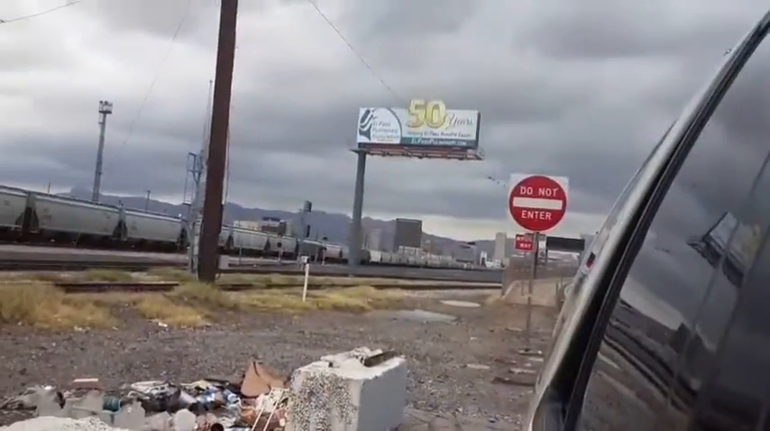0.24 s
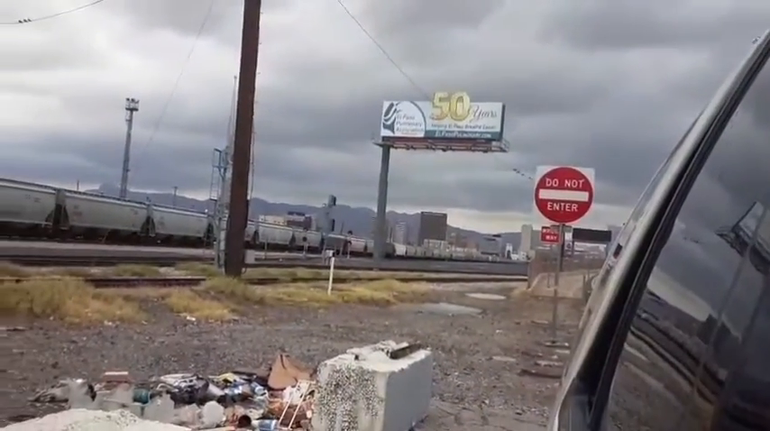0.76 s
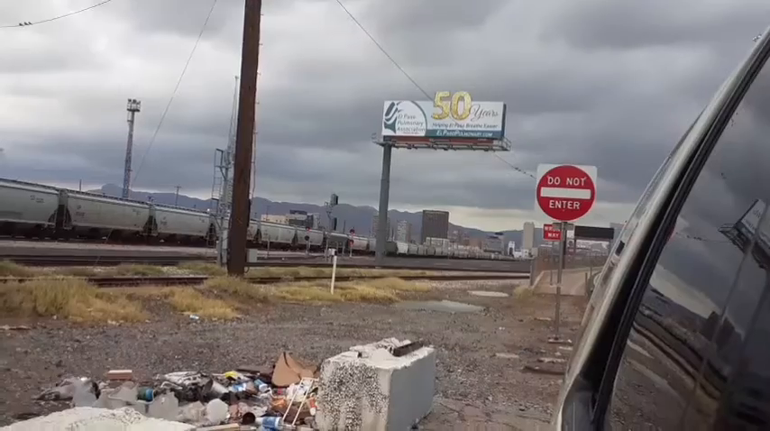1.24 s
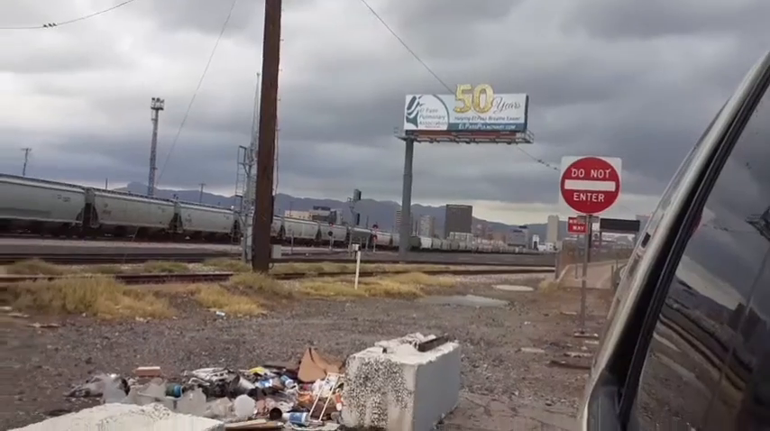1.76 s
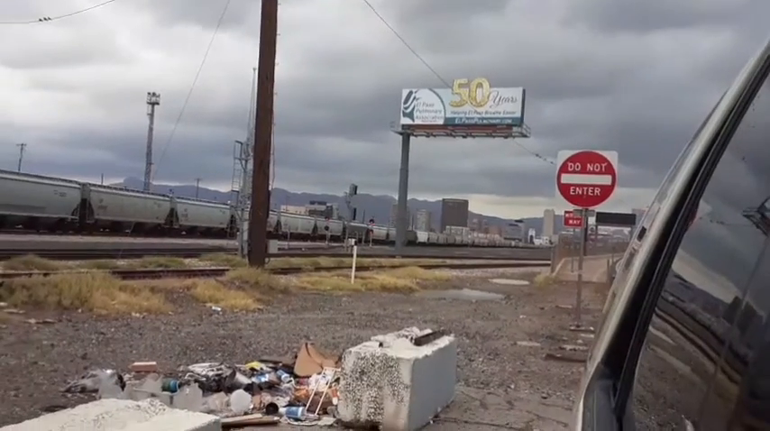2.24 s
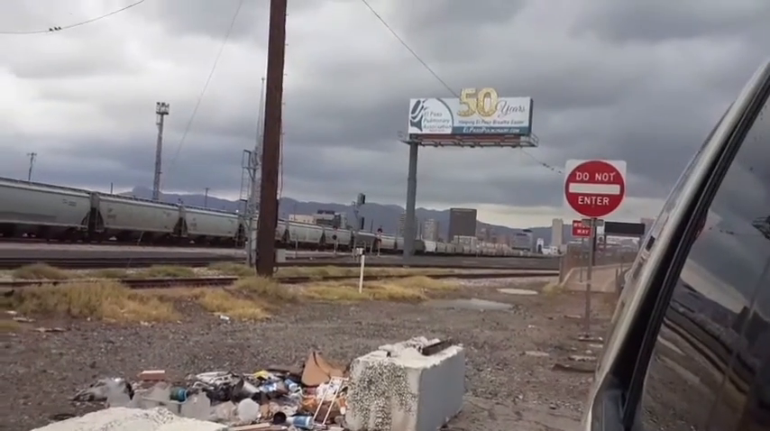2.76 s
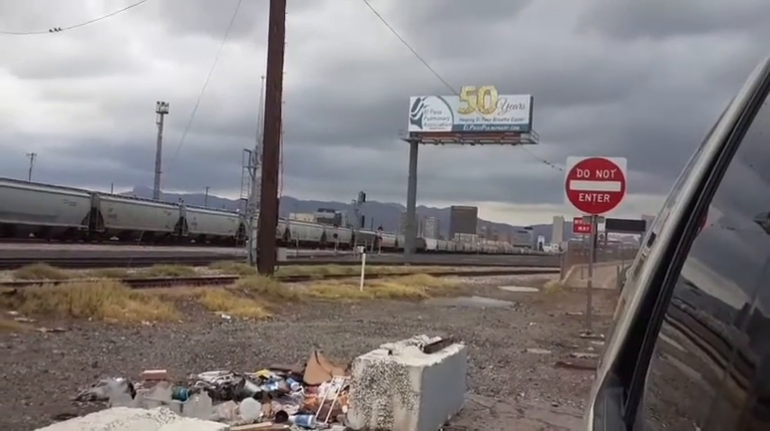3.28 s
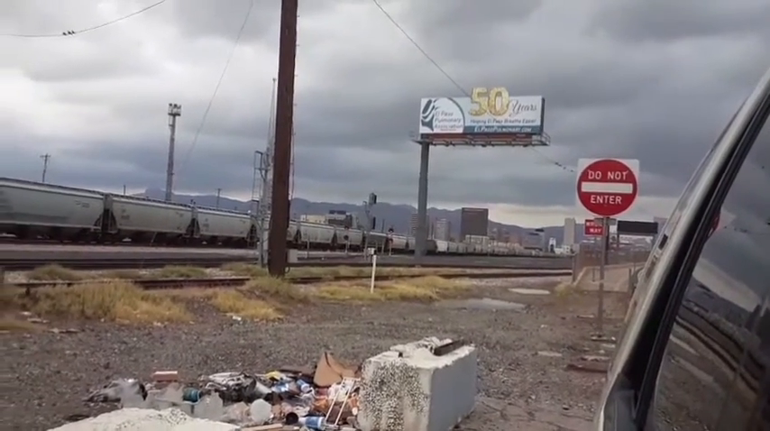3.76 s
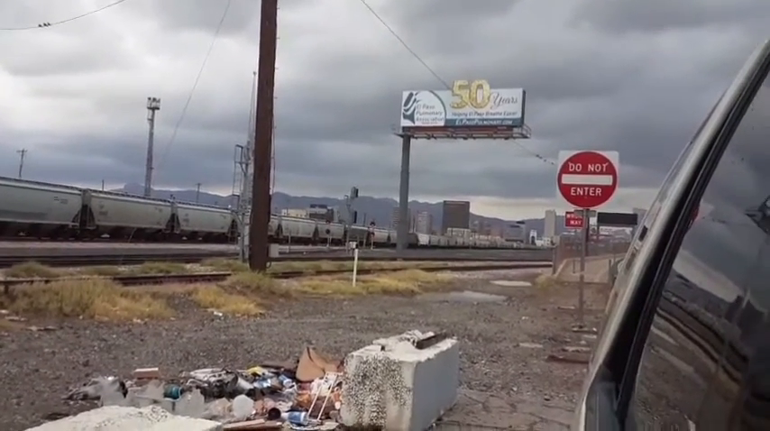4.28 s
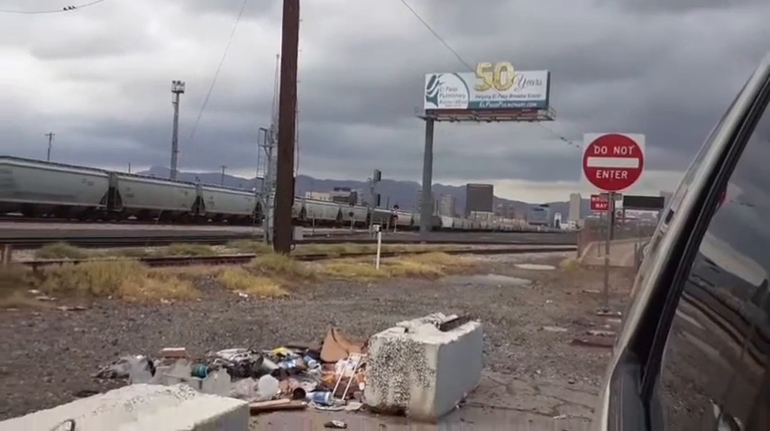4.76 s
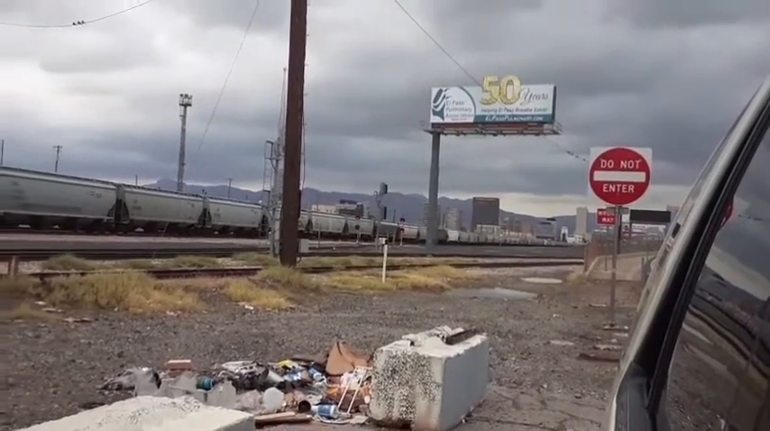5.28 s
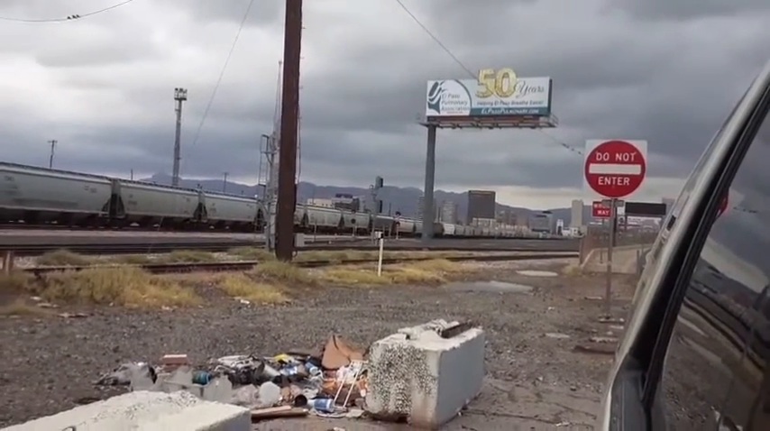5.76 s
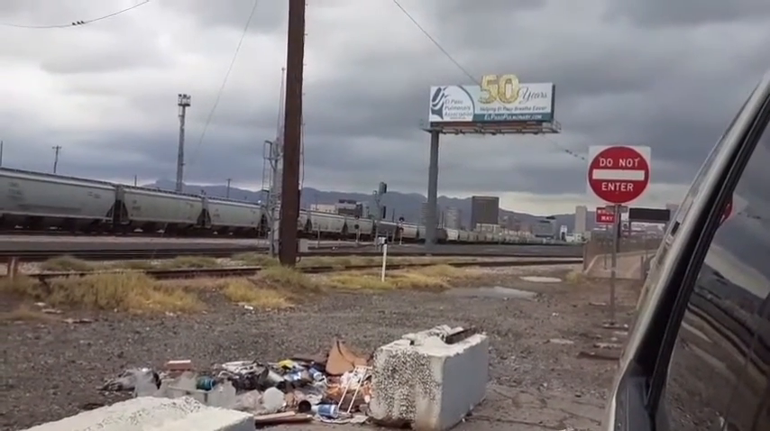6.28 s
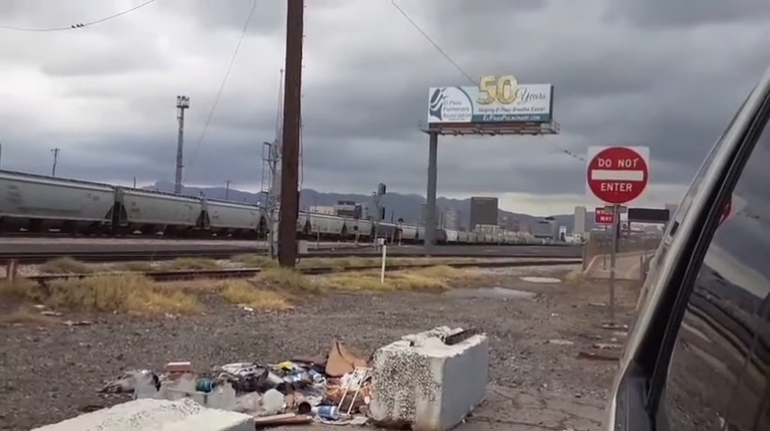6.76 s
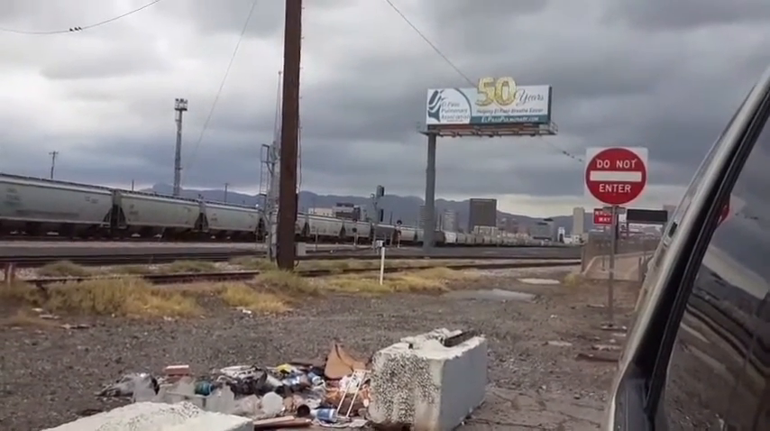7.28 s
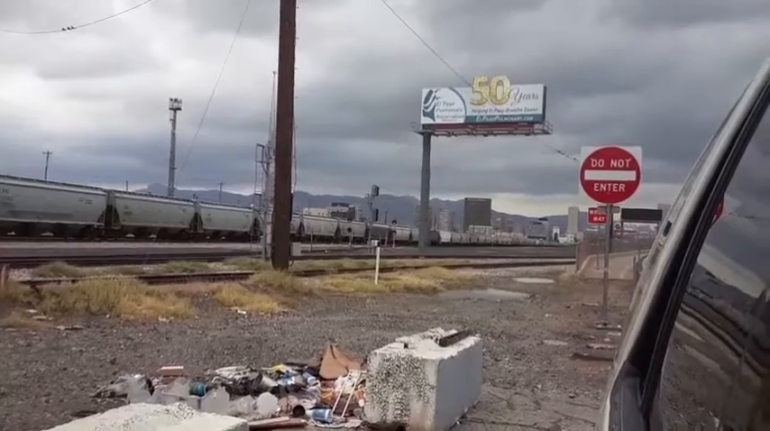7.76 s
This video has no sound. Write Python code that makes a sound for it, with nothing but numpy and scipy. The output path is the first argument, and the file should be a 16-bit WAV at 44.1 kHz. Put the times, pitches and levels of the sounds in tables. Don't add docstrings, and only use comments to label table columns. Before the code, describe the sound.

A slow freight train washes past in a rail yard while one wheel squeals piercingly, swelling and fading, with wind buffeting the microphone.

```python
import sys
import numpy as np
from scipy import signal
from scipy.io import wavfile
from scipy.ndimage import uniform_filter1d

SR = 44100
rng = np.random.default_rng(int(sys.argv[2]) if len(sys.argv) > 2 else 0)


def convert_level_to_amplitude(level_db):
    exponent = np.asarray(level_db, float) / 20
    return 10 ** exponent


def put_to_file(sound):
    columns = np.atleast_2d(sound).T
    safe = np.clip(columns, -1, 1)
    whole_steps = np.round(safe * 32767)
    wavfile.write(sys.argv[1], SR, whole_steps.astype(np.int16))


N = 354117
T = np.arange(N) / SR
SLIP_HZ = 2260.9

# t/s, roughness as level of the third multiple/dB, overdrive as level of the ring's octave/dB
SLIP = [(0, -66.5, -69), (.6, -49, -65), (1.05, -61.5, -55), (1.4, -63.5, -37.5), (1.8, -71.5, -53),
        (2.05, -60.5, -49), (2.3, -69.5, -72), (2.9, -71.5, -70), (3.03, -56.5, -42.5), (3.2, -81, -60),
        (3.55, -55.5, -50), (4.22, -72.5, -68), (4.5, -59.5, -46), (5.1, -50.5, -58), (5.7, -60.5, -61),
        (6.15, -54, -39), (6.9, -53.5, -46.5), (8.03, -82, -71)]


def evened(x):
    return x / np.sqrt(np.mean(abs(x) ** 2) + 1e-20)


def read(points, hz):
    f, value = np.transpose(points)
    return np.interp(np.log(hz + 1), np.log(f + 1), value)


def played(rows):
    s, *columns = np.transpose(rows)
    return [np.interp(T, s, c) for c in columns]


def sides(pan_db):
    return np.sqrt(2 / (1 + convert_level_to_amplitude(np.array([-2 * pan_db, 2 * pan_db]))))


def bump(s, db, width):
    u = np.tanh((T[::16] - s) / max(width, .004))
    return u + 1j * convert_level_to_amplitude(db) * np.sqrt(1 - u ** 2)


def lifted(rows):
    sizes = [abs(bump(*row)) for row in rows]
    return np.interp(T, T[::16], np.prod(sizes, axis=0))


def fading(width_hz, shared=3.6):
    r = np.exp(-np.pi * width_hz / SR)
    a, b = rng.standard_normal((N // 16 + 2, 3, 2)).T
    z = signal.lfilter([1], [1, -r ** 64], a + 1j * b)
    z = signal.lfilter([1], [1, -r ** 16], z)
    z = signal.resample_poly(z[:2] + shared * z[2], 16, 1, axis=1)[:, :N]
    return evened(z)


def line(hz, width_hz, steady, shared=1.34):
    steady = np.clip(steady, 0, 1)
    swing = steady + np.sqrt(1 - steady ** 2) * fading(width_hz, shared)
    return np.sqrt(2) * (swing * np.exp(2j * np.pi * hz * T)).real


def noise(spectrum, same, patchy_db, flicker_db):
    # f/Hz, phase/rad
    lead_curve = [(0, 0), (1000, .3), (2500, 1.3), (4400, 6.5), (7600, 6 * np.pi), (16000, 6 * np.pi)]
    frames, hz = N // 256 + 5, np.fft.rfftfreq(1024, 1 / SR)
    a, b, c, d, patches = rng.standard_normal((frames, 513, 5)).T
    patches = uniform_filter1d(patches, size=8, axis=0)
    patches = evened(uniform_filter1d(patches, size=10, axis=1))
    flicker = evened(uniform_filter1d(rng.standard_normal(frames), size=3))
    same = np.clip(same * np.ones(513), 0, 1)[:, None]
    left = a + 1j * b
    right = same * left + np.sqrt(1 - same ** 2) * (c + 1j * d)
    right = right * np.exp(-1j * read(lead_curve, hz))[:, None]
    shape_db = read(spectrum, hz) - 80 * (hz > spectrum[-1][0])
    gain = convert_level_to_amplitude(shape_db)[:, None] * convert_level_to_amplitude(patchy_db * patches + flicker_db * flicker)
    spectra = np.array([left, right]) * gain
    return evened(signal.istft(spectra, nperseg=1024, noverlap=768)[1][:, :N])


def squeal():
    # t/s, level/dB, left lead/rad
    grip = [(0.0, -45.5, 0.19), (0.274, -28, 0.74), (0.66, -27, -0.034), (1.04, -20.5, -0.16),
            (1.388, -12.5, 0.58), (1.702, -21.5, 0.64), (2.131, -13.5, 0.1), (2.613, -47.6, 0.28),
            (2.922, -40, -0.72), (2.96, -24.5, -0.24), (3.51, -19.5, 0.43), (4.24, -36.5, 0.83),
            (4.735, -19, -0.3), (5.223, -20, 0.3), (5.46, -36, 1.1), (6.313, -19.5, 0.9),
            (7.161, -26, 1.45), (8.03, -49, 0.7)]
    # t/s, gain/dB, half width/s
    swells = [(0.398, 4.2, 0.013), (0.585, 8.7, 0.013), (0.702, 9.0, 0.039), (0.884, 6.5, 0.013),
              (0.988, 9.7, 0.051), (3.038, 7.1, 0.054), (3.552, 8.5, 0.014), (3.627, 7.2, 0.013),
              (3.981, 7.7, 0.03), (4.228, 7.8, 0.013), (4.418, 11.0, 0.026), (4.862, 5.0, 0.02),
              (5.077, 8.4, 0.013), (5.264, 7.3, 0.021), (5.367, 7.7, 0.013), (5.483, 8.6, 0.013),
              (5.664, 6.4, 0.013), (5.952, 11.0, 0.017), (6.067, 4.9, 0.014), (6.159, 6.8, 0.027),
              (6.272, 6.4, 0.015), (6.373, 4.5, 0.017), (6.826, 11.0, 0.013), (6.887, 11.0, 0.013),
              (7.155, 5.8, 0.015), (7.217, 5.8, 0.013), (7.454, 7.7, 0.013), (7.573, 6.5, 0.028)]
    # t/s, depth/dB, half width/s
    cancels = [(0.23, -17.6, 0.024), (0.506, -14.6, 0.012), (0.66, -18.1, 0.013), (0.795, -9.9, 0.04),
               (0.964, -12.0, 0.034), (1.191, -8.8, 0.022), (2.332, -35.0, 0.015), (3.449, -18.0, 0.03),
               (3.582, -29.3, 0.054), (3.665, -24.1, 0.014), (3.787, -9.4, 0.034), (4.08, -13.7, 0.01),
               (4.382, -23.8, 0.043), (4.838, -17.3, 0.021), (4.961, -3.9, 0.056), (5.022, -10.8, 0.015),
               (5.123, -13.7, 0.07), (5.915, -8.7, 0.037), (6.006, -8.2, 0.037), (6.233, -13.8, 0.034),
               (6.444, -13.5, 0.022), (6.497, -14.6, 0.07), (6.617, -6.2, 0.016), (6.776, -10.4, 0.018),
               (6.844, -19.8, 0.039), (6.905, -19.1, 0.033), (6.991, -9.0, 0.07), (7.136, -32.3, 0.01),
               (7.316, -35.0, 0.022), (7.4, -11.9, 0.016)]
    level_db, lead = played(grip)
    rough_db = played(SLIP)[0]
    turns = [bump(*row) for row in cancels]
    flips = rng.random(len(cancels)) < .5
    turns = [z.conj() if flip else z for z, flip in zip(turns, flips)]
    fades = np.interp(T, T[::16], np.prod(turns, axis=0))
    flutter_db = np.minimum(-24 - .7 * level_db + .35 * (rough_db + 58), 2)
    middle = fades * (lifted(swells) + convert_level_to_amplitude(flutter_db) * fading(24)[0])
    scatter = np.minimum(convert_level_to_amplitude(0.66 * rough_db + 35), .75) * fading(14.7)
    turned = np.tan(np.clip(lead, -2, 2) / 2) + scatter[0].real
    left_share = 0.29
    apart = middle * (left_share + 1j * turned)
    apart = apart + .4 * scatter[1] * uniform_filter1d(abs(middle), size=4000)
    ring = np.exp(4j * np.pi * SLIP_HZ * T)
    tone = convert_level_to_amplitude(level_db) * ring * np.array([middle + apart, middle - apart])
    return np.sqrt(2) * tone.real


def slips():
    three_db, four_db = played(SLIP)
    one_db = 1.064 * three_db + 8
    rows = [(1, one_db + 3.5, one_db + 0.5), (3, three_db + 5.0, three_db - 2),
            (4, four_db + 2.5, three_db + 3.5), (5, three_db - 3, three_db - 6),
            (6, 0.72 * four_db - 25.5, three_db - 17.0)]
    out = convert_level_to_amplitude(.6 * three_db - 11) * line(2 * SLIP_HZ, 170, 0)
    for k, db, skirt_db in rows:
        chop = evened(uniform_filter1d(rng.standard_normal(N), size=2500))
        chop_db = np.clip(.2 * three_db + 14, 0, 3) * chop
        shared = 1.5 if k < 5 else .6
        out = out + convert_level_to_amplitude(db + chop_db - 2.5) * line(k * SLIP_HZ, 9 + 3 * k, 0.77, shared)
        out = out + convert_level_to_amplitude(skirt_db) * line(k * SLIP_HZ, 140, 0, .6 * k)
    return out * sides(2.4)[:, None]


def wheels():
    # start t/s, end t/s, level/dB, width/Hz
    squeaks = [(0, 1.95, -48.5, 15), (2.75, 2.82, -38, 20), (4.32, 4.55, -49.5, 27),
               (5.25, 5.42, -47.5, 31), (6.08, 6.33, -46, 31), (6.8, 7.25, -51, 24),
               (7.03, 7.38, -48.5, 35), (.5, 1.85, -56.5, 10), (1.95, 2.3, -56, 10), (2.3, 2.95, -59.5, 15),
               (3.5, 4.3, -55, 20), (4.85, 5.2, -52.5, 13), (7.3, 8, -59, 15), (5.9, 6.7, -61, 30),
               (6.3, 6.75, -59, 30), (7.0, 7.15, -54, 30), (6.8, 7.3, -57, 40), (.7, 1.0, -58, 40),
               (3.5, 3.66, -56, 40)]
    rings_hz = [2615, 2668, 2665, 2700, 2670, 2665, 2491, 3981, 3981, 4050, 4044, 3981, 4044, 7754, 13092,
                3800, 3480, 11800, 5700]
    out = np.zeros((2, N))
    for (start, end, db, width_hz), hz in zip(squeaks, rings_hz):
        gate = np.clip(np.minimum(T - start + .01, end - T) / .03, 0, 1)
        out += convert_level_to_amplitude(db) * gate * line(hz, width_hz, 0.07)
    return out


def train():
    # t/s, rolling level/dB, scraping hiss level/dB
    passing = [
        (0.0, -36.5, -59),
        (1.47, -43, -54.5),
        (2.39, -44, -61),
        (5.9, -40.5, -59),
        (6.02, -41, -48.5),
        (7.0, -43.5, -59),
        (8.03, -41, -61),
    ]
    # f/Hz, level/dB
    rolling_curve = [(100, -31), (250, -7), (500, -3), (950, -3), (1100, -8), (1700, -12.5), (2800, -15.5),
                     (3200, -19.5), (4500, -21), (6000, -42.5)]
    # f/Hz, level/dB
    scrape_curve = [(2500, -16.5), (4000, -2), (4900, 9), (5600, 7), (7000, 1.5), (9000, -1), (11500, -1),
                    (14000, 0), (16000, -9)]
    # f/Hz, coherence/1
    likeness = [(60, .5), (600, .5), (1400, .2), (3000, .4), (6500, .5), (8500, .85), (11000, .72),
                (15000, .75)]
    rolling_db, hiss_db = played(passing)
    same = read(likeness, np.fft.rfftfreq(1024, 1 / SR))
    rolling = convert_level_to_amplitude(rolling_db + 3.5) * noise(rolling_curve, same, 1.82, 1.0)
    scrape_db = 0.59 * hiss_db + .22 * played(SLIP)[0] - 2.5
    scrape = convert_level_to_amplitude(scrape_db) * noise(scrape_curve, same, 2.2, 1.4)
    return (rolling + scrape) * sides(1.0)[:, None]


def wind():
    # t/s, level/dB
    strength = [
        (0.0, -23),
        (0.5, -26),
        (1.3, -31.5),
        (2.2, -33),
        (3.0, -33.5),
        (4.3, -27),
        (5.4, -34.5),
        (6.1, -39),
        (7.0, -33.5),
        (8.03, -36.5),
    ]
    # t/s, lift of the bass/dB, lift of the low middle/dB, half width/s
    gust_rows = [(0.126, 5.5, 0.5, 0.024), (2.222, 9, -1.5, 0.0098), (2.49, 5.5, 6.5, 0.056),
                 (2.722, 8, 1, 0.028), (3.001, 7.5, 4, 0.1), (3.186, 8, 1, 0.016), (3.732, 12, 6, 0.0089),
                 (3.894, 4.5, 2.5, 0.028), (4.216, 4.5, 3, 0.021), (4.29, 6.5, 3, 0.0055),
                 (4.475, 2.5, 3.5, 0.1), (4.985, 10, 12, 0.02), (5.119, 12.5, 7, 0.021),
                 (5.53, 6.5, 11, 0.034), (5.636, 7, 9, 0.026), (5.701, 7, 9.5, 0.015),
                 (5.865, 14.5, 16.5, 0.035), (6.207, 8, 9.5, 0.042), (6.593, 9.4, 3, 0.0078),
                 (6.687, 11, 7, 0.0084), (6.986, 7.5, 8, 0.0092), (7.537, 1, 10, 0.0069),
                 (7.801, 0, 13.5, 0.0076), (7.888, 5, 12, 0.012)]
    # f/Hz, level per Hz/dB
    buffet_curve = [(20, -40), (45, -10), (64, 9), (85, 0), (105, -6), (130, -6), (190, -7), (260, -11),
                    (400, -22)]
    # f/Hz, level per Hz/dB
    reach_curve = [(150, -5), (240, -8), (400, -1.5), (700, -9.5), (1200, -31)]
    db, = played(strength)
    bass_lift = lifted((s, lift_db, width) for s, lift_db, _, width in gust_rows)
    reach_lift = lifted((s, lift_db, width) for s, _, lift_db, width in gust_rows)
    lumps = uniform_filter1d(rng.standard_normal(N), size=500)
    lumps = convert_level_to_amplitude(1.65 * evened(uniform_filter1d(lumps, size=300)))
    bass = convert_level_to_amplitude(db) * bass_lift * noise(buffet_curve, 0.77, 1.94, 1.1)
    slope = 1.42
    reach_gain = convert_level_to_amplitude(slope * db + 1.5) * reach_lift ** slope
    gusts = reach_gain * sides(3.6)[:, None] * noise(reach_curve, 0.38, 2.7, 2.7)
    return (bass + gusts) * evened(lumps)


def hum():
    fade = convert_level_to_amplitude(-9.0 * T) * np.clip((.95 - T) / .25, 0, 1) * np.clip((T - .12) / .35, 0, 1)
    orders = [(1, -22), (2, -33), (3, -33), (4, -25), (6, -33)]  # order, level/dB
    return fade * sum(convert_level_to_amplitude(db) * line(k * 61.7, 6, .7)[0] for k, db in orders)


def scene():
    return squeal() + slips() + wheels() + train() + wind() + hum()


def thinned(x):
    loud_db = 10 * np.log10(uniform_filter1d((x ** 2).mean(0), size=2048) + 1e-12)
    for low_hz in np.r_[5170, np.arange(5690, 15000, 690)]:
        taps = signal.firwin(511, [low_hz, low_hz + 600], pass_zero=False, fs=SR)
        band = signal.oaconvolve(x, taps[None], "same")
        chance = uniform_filter1d(rng.standard_normal(N // 1024 + 1), size=2)
        chance = np.repeat(chance, 1024)[:N]
        gone = loud_db + 8 * chance > -19 if low_hz < 6300 else chance > 1.05
        x = x - uniform_filter1d(gone * 1., size=700) * band
    return x


def top_cut(x):
    return signal.sosfilt(signal.butter(12, 15790, fs=SR, output="sos"), x)


def record(dry):
    # start t/s, end t/s, depth/dB
    cuts = [(0.786, 0.843, -21), (0.878, 0.952, -18), (1.268, 1.332, -20), (1.71, 1.798, -16),
            (2.732, 2.783, -28), (2.817, 3, -14), (3.036, 3.113, -37), (3.167, 4.238, -19),
            (4.331, 4.626, -28), (4.643, 4.96, -20), (4.994, 5.044, -21), (5.116, 5.193, -21),
            (5.267, 5.516, -26), (5.72, 5.835, -26), (5.883, 6.163, -22), (6.213, 6.897, -22),
            (7.013, 7.14, -36), (7.21, 7.531, -19), (7.543, 7.6, -24), (7.702, 7.762, -26),
            (7.923, 8.013, -18)]
    flutter = 1 + 0.2 * evened(uniform_filter1d(rng.standard_normal(N), size=1500))
    cut_db = sum(db * ((T > start) & (T < end)) for start, end, db in cuts)
    cut_db = cut_db * np.clip(flutter, 0, 2)
    kept = convert_level_to_amplitude(uniform_filter1d(cut_db, size=600))
    bass = signal.oaconvolve(dry[0], signal.firwin(2047, 255, fs=SR), "same")
    filtered = thinned(np.array([dry[0] - (1 - kept) * bass, dry[1]]))
    edge = signal.firwin(1023, [40, 15780], pass_zero=False, window=("kaiser", 5), fs=SR)
    return top_cut(signal.oaconvolve(filtered, edge[None], "same"))


dry = scene()
out = record(dry)
put_to_file(out)
```